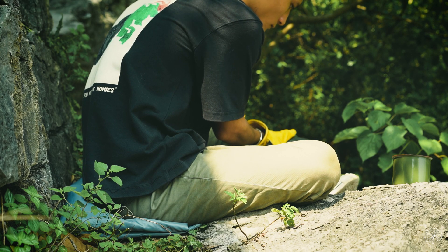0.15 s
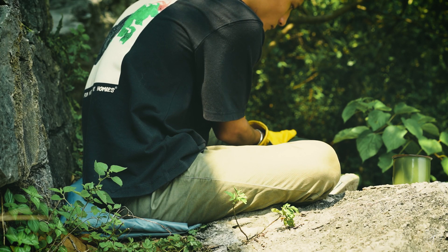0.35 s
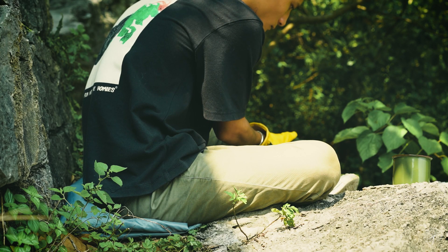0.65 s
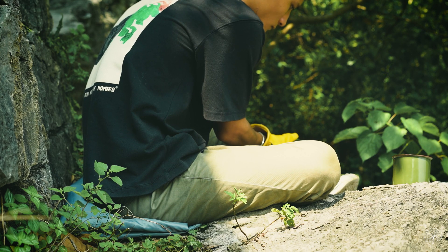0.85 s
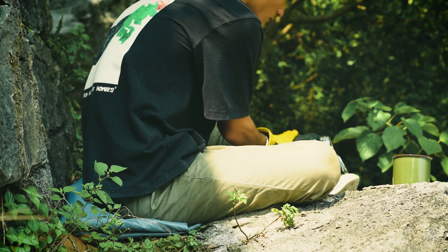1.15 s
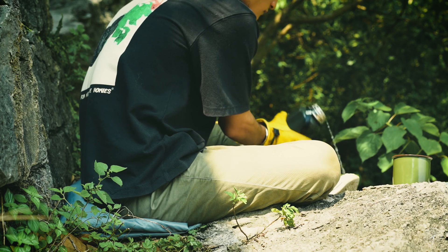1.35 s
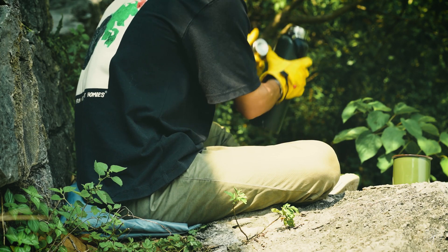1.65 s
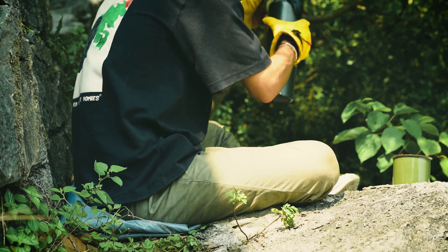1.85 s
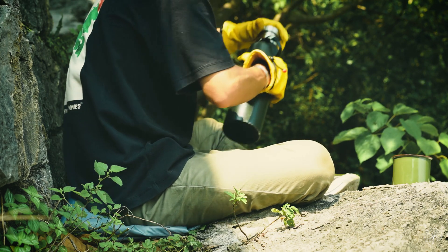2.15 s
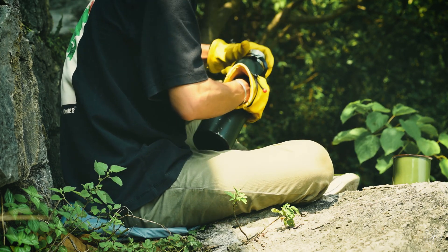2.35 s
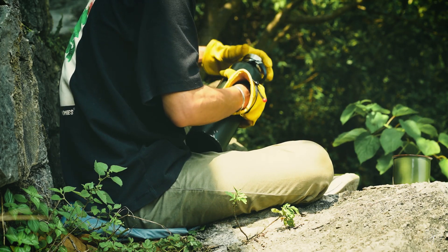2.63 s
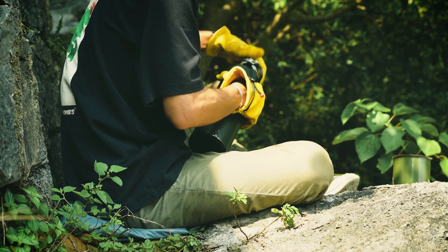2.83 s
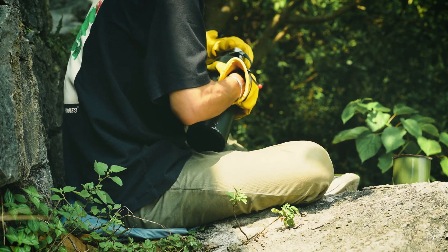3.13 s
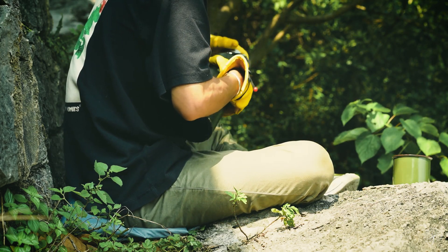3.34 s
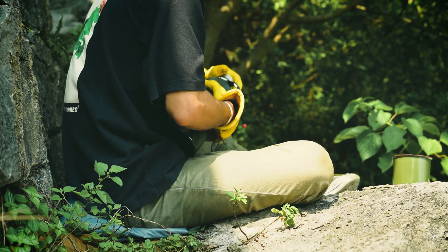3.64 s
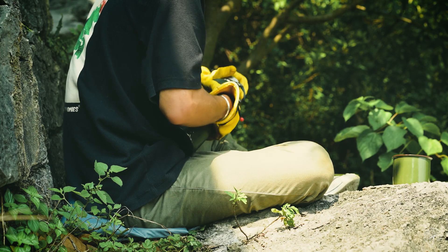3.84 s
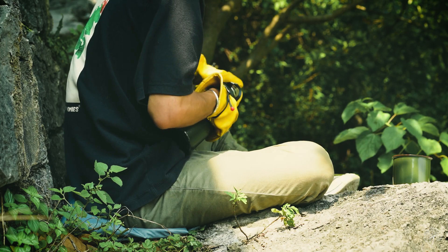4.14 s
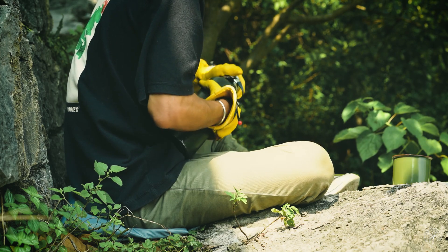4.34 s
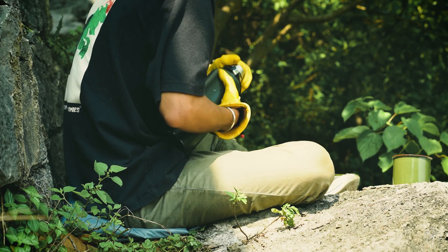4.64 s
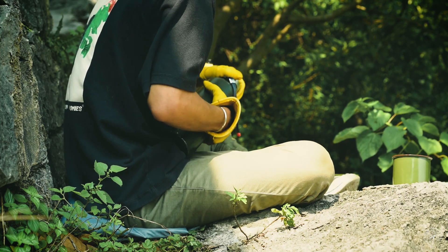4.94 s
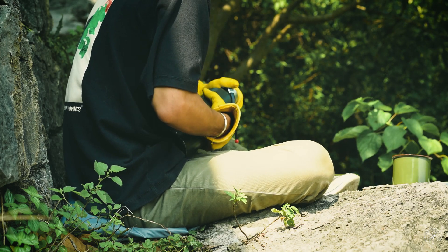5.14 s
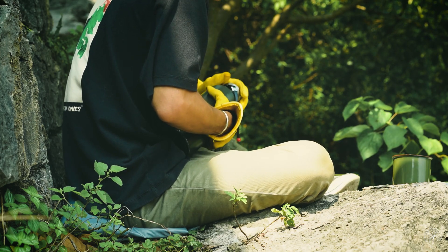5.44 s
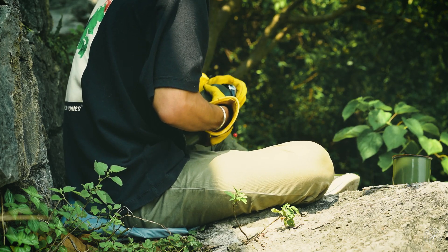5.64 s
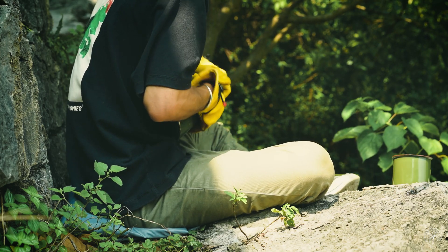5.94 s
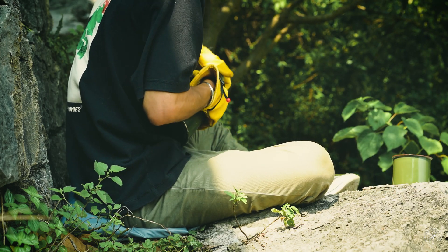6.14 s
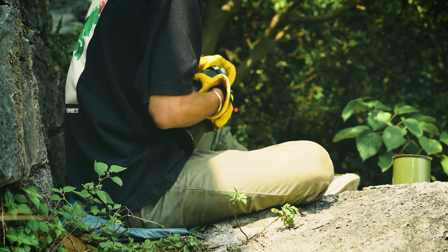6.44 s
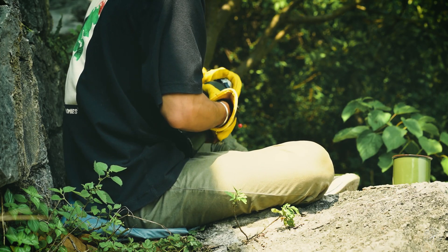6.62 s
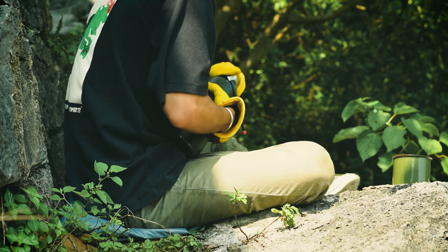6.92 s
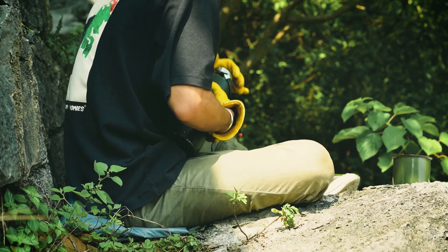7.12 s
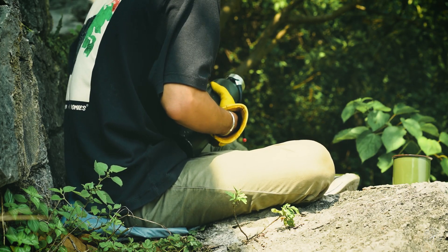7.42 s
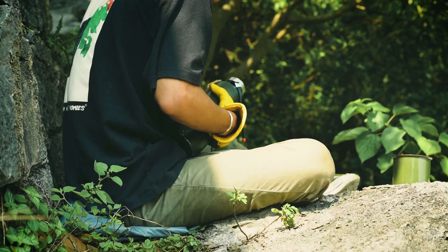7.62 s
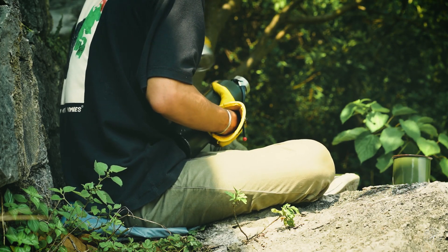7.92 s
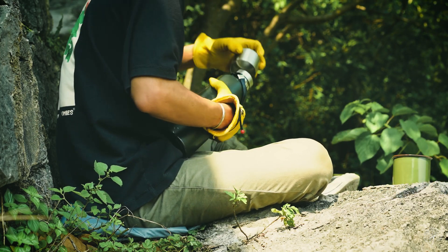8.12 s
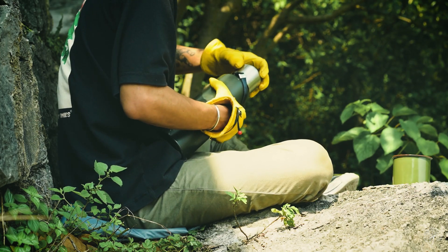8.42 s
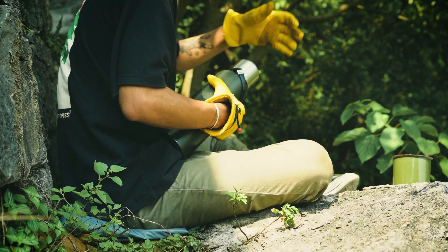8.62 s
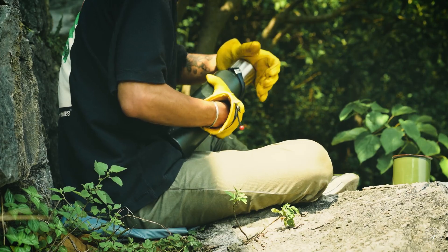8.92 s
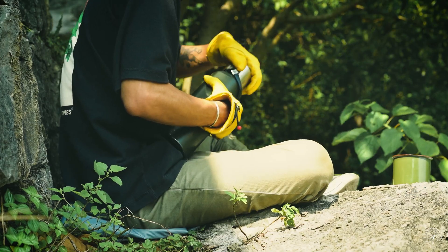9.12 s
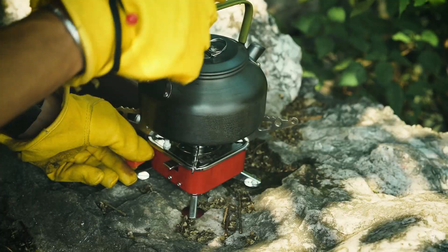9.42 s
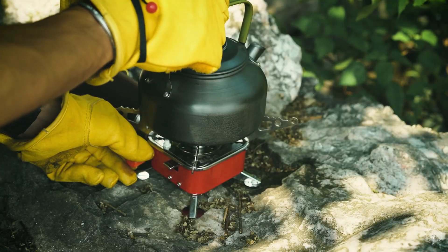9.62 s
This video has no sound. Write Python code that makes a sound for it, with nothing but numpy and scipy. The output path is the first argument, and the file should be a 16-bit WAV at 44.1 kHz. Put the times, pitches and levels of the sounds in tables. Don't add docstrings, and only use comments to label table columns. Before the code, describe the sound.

Soft glove and sleeve rubbing comes first under calm leaf hiss and a falling bird whistle. A bright stopper clink and rattle follow, then dry steel turns and leather grip noises. Later a thin cup scrapes, clatters down ringing, rocks into place and gets a dull slap. Close, dry handling stands before a wide wooded background; the last moment jumps to a quieter spot with chirping.

```python
import sys
import numpy as np
from scipy import signal
from scipy.fft import rfft, irfft, next_fast_len
from scipy.io import wavfile
from scipy.ndimage import uniform_filter1d

SR = 44100
rng = np.random.default_rng(int(sys.argv[2]) if len(sys.argv) > 2 else 0)


def store_pcm(level_fs):
    pcm = np.round(np.clip(level_fs, -1, 1) * 32767).astype(np.int16)
    wavfile.write(sys.argv[1], SR, np.atleast_2d(pcm).T)


def nominal_scale(level):
    x = np.asarray(level, float) / 20
    return 10 ** x


N = 430857


def evened(x):
    return x / np.sqrt(np.mean(x ** 2) + 1e-20)


def read(points, hz):
    f, value = np.transpose(points)
    return np.interp(np.log(hz + 1), np.log(f + 1), value)


def add(mix, s, sound):
    part = mix[:, round(s * SR):][:, :sound.shape[1]]
    part += sound[:, :part.shape[1]]


def coloured(x, db_of):
    length = x.shape[-1]
    size = next_fast_len(length)
    gain = nominal_scale(db_of(np.fft.rfftfreq(size, 1 / SR)))
    return irfft(rfft(x, size) * gain, size)[..., :length]


def resonate(x, hz, width):
    return signal.lfilter(*signal.iirpeak(hz, hz / max(width, 5), SR), x)


def pair(size, same):
    a, b = rng.standard_normal((2, size))
    same = np.clip(same, 0, 1)
    return np.array([a, same * a + np.sqrt(1 - same ** 2) * b])


# f/Hz, width/Hz, level/dB
FAR_DRONE = (398, 47, -74)


def drone():
    hz, width, db = FAR_DRONE
    return nominal_scale(db) * evened(resonate(resonate(pair(N, 0.96), hz, width), hz, width))


# f/Hz, level/dB per Hz
AIR_SPECTRUM = [(15, -70), (32, -37), (228, -8.5), (461, -13), (500, -7), (587, -8), (981, -4), (1120, -4),
                (1220, 0), (1680, 0.5), (2970, 3.5), (6660, 1.5), (15800, -9)]
# f/Hz, likeness [0-1]
AIR_LIKENESS = [(60, 0.92), (200, 1), (300, 0.85), (550, 0.44), (1650, 0.22), (4970, 0.006), (15000, 0.068)]
# f/Hz, left over right/dB
AIR_BALANCE = [(60, 0), (240, 0), (950, -2), (3770, 0.5), (15000, -5)]
# t/s, level/dB
WIND_STRENGTH = [
    (0.0, 0.5),
    (0.42, 0.5),
    (2.79, 5.5),
    (5.72, 5),
    (7.52, 8),
    (7.91, 6.5),
    (9.19, 7.5),
    (9.37, 9),
    (9.382, 1),
    (9.77, 1),
]
# calm level/dB, gain/dB per dB of wind, change at the new place/dB
AIR_LAYERS = [
    (-64, 0.4156, -0.5),
    (-57.5, 1.03, 1.5),
    (-62, 1.3965, 2.5),
]
NEW_PLACE_S = 9.376


def air(patchy_db=1.5, flicker_db=0.77):
    frames, hz = N // 128 + 5, np.fft.rfftfreq(512, 1 / SR)
    a, b, c, d, patches = rng.standard_normal((frames, 257, 5)).T
    patches = evened(uniform_filter1d(uniform_filter1d(patches, size=10, axis=0), size=20, axis=1))
    flicker = evened(uniform_filter1d(rng.standard_normal(frames), size=6))
    t = np.arange(frames) * 128 / SR
    power = nominal_scale(read(AIR_SPECTRUM, hz)) ** 2
    wind_db = np.interp(t, *np.transpose(WIND_STRENGTH))
    shares = [read([(700, 1), (1400, 0)], hz),
              read([(700, 0), (1400, 1), (5000, 1), (7200, 0)], hz),
              read([(5000, 0), (7200, 1)], hz)]
    field = 0
    for share, (calm_db, per_wind_db, moved_db) in zip(shares, AIR_LAYERS):
        level_db = calm_db + per_wind_db * wind_db + moved_db * (t > NEW_PLACE_S)
        band = share * power
        field = field + np.outer(band / np.sum(band), nominal_scale(level_db) ** 2)
    treble_flicker = np.outer(read([(800, 0.0044), (6000, flicker_db)], hz), flicker)
    field = np.sqrt(field) * nominal_scale(patchy_db * patches + treble_flicker)
    same = np.clip(read(AIR_LIKENESS, hz), 0, 1)[:, None]
    left = a + 1j * b
    right = same * left + np.sqrt(1 - same ** 2) * (c + 1j * d)
    spectra = np.array([left, right]) * field
    spectra *= nominal_scale(np.outer([.5, -.5], read(AIR_BALANCE, hz)))[:, :, None]
    return nominal_scale(3.5) * signal.istft(spectra, nperseg=512, noverlap=384)[1][:, :N]


# time/tail times, level/dB
GLIDE_FADE = [(-.08, -9), (.08, 1), (.25, -6), (.6, -7), (1.05, -12), (1.45, -24), (1.9, -27)]
KNEE_HZ, DROP_HZ_PER_S = 3450, 115000
CHIP_S, CHIP_DB, DIP_DB = .016, -15.5, -18
SWEEP_LEAN_DB, SWEEP_BURR = -4.5, 0.27


def sweep(knee, db, top_hz, tail, floor_hz, hold):
    drop = (top_hz - KNEE_HZ) / DROP_HZ_PER_S
    along, fade_db = np.transpose(GLIDE_FADE)
    along = along * hold
    t = np.arange(-drop - CHIP_S, along[-1] * tail, 1 / SR)
    curl = top_hz * (1 - 0.112 * np.clip(1 - 2 * (t - t[0]) / CHIP_S, 0, 1))
    falling = np.minimum(KNEE_HZ - DROP_HZ_PER_S * t, curl)
    levelling = floor_hz + (KNEE_HZ - floor_hz) * np.exp(-t / tail)
    hz = np.where(t < 0, falling, levelling)
    hz = uniform_filter1d(hz, size=350, mode="nearest")
    times = [t[0], -drop - CHIP_S / 2, -drop * .7, *(along * tail)]
    level = np.interp(t, times, [DIP_DB, CHIP_DB, DIP_DB, *fade_db])
    return knee + t[0], hz, db + level, SWEEP_LEAN_DB, SWEEP_BURR


def note(start, length, from_hz, to_hz, db, lean_db, burr):
    u = np.arange(0, length, 1 / SR) / length
    swell_db = np.interp(u, [0, 0.38, 1], [-6.5, 0, -6.5])
    return start, from_hz + (to_hz - from_hz) * u, db + swell_db, lean_db, burr


# knee t/s, level/dB, top f/Hz, tail time/s, floor f/Hz, glide hold [factor]
WHISTLES = [
    (.739, -32, 5650, 0.062, 1650, 1.1),
    (3.37, -30, 6100, .024, 1980, 1.55),
]
# t/s, length/s, from f/Hz, to f/Hz, level/dB
WARBLE_NOTES = [(1.19, 0.024, 5900, 4700, -51), (2.822, 0.1, 3540, 4490, -42),
                (2.952, 0.058, 4450, 2920, -44), (3.435, 0.039, 3800, 2950, -52),
                (5.669, 0.088, 3350, 3950, -43.5), (5.813, 0.068, 4050, 2800, -43),
                (6.426, 0.056, 3160, 3470, -45), (6.458, 0.093, 3440, 2850, -45),
                (6.448, 0.032, 3540, 3900, -42), (6.504, 0.035, 3982, 3780, -42.5),
                (7.079, .1, 3225, 4090, -46), (7.186, 0.022, 3540, 2830, -47),
                (7.232, 0.11, 3630, 4080, -43.5), (7.26, 0.048, 3200, 2740, -47),
                (7.375, 0.065, 4110, 2810, -46)]
# t/s, length/s, from f/Hz, to f/Hz, level/dB
NEW_PLACE_NOTES = [
    (9.385, 0.045, 6000, 4600, -50),
    (9.43, 0.031, 4600, 5400, -49),
    (9.452, 0.09, 5400, 5000, -49.5),
    (9.52, 0.13, 4750, 4000, -53),
    (9.47, 0.15, 3150, 2700, -51),
    (9.39, 0.064, 3100, 3100, -57),
]


def birds(trees, burr_hz=135., swing=.065, echo_db=-3., far_db=6., echo_t60=.3, near_t60=.06, near_db=6.):
    lag = np.arange(SR // 4) / SR
    calls = [sweep(*row) for row in WHISTLES]
    calls += [note(*row, lean_db=1.5, burr=0.82) for row in WARBLE_NOTES]
    calls += [note(*row, lean_db=2.0, burr=0.63) for row in NEW_PLACE_NOTES]
    for s, hz, db, lean_db, burr in calls:
        wobble, shake = evened(uniform_filter1d(rng.standard_normal((2, 20000)), size=150))[:, :len(hz)]
        turn = 2 * np.pi * np.cumsum(burr_hz * (1 + 0.22 * wobble)) / SR
        pitch = uniform_filter1d(hz, size=200) * (1 + burr ** 2 * swing * (np.sin(turn) + .5 * shake))
        tone = np.sin(2 * np.pi * np.cumsum(pitch) / SR) * (1 + burr * np.cos(turn))
        tone *= signal.windows.tukey(len(hz), .06)
        echoes = np.sign(rng.standard_normal((2, len(lag)))) * (rng.random((2, len(lag))) < 3000 / SR)
        echoes *= nominal_scale(-60 * lag / echo_t60) + nominal_scale(near_db - 60 * lag / near_t60)
        echoes /= np.linalg.norm(echoes, axis=1, keepdims=True)
        wet = nominal_scale(echo_db + far_db * burr)
        echoes = (wet * echoes + (lag == 0)) / np.sqrt(1 + wet ** 2)
        heard = signal.fftconvolve((np.sqrt(2) * nominal_scale(db) * tone)[None], echoes, axes=1)
        add(trees, s, heard * nominal_scale(np.array([[.5], [-.5]]) * lean_db))


def ledge(x, echo_db=-14., t60=0.18):
    lag = np.arange(SR // 4) / SR
    taps = rng.standard_normal((2, len(lag))) * (rng.random((2, len(lag))) < 2000 / SR)
    taps *= (lag > .003) * nominal_scale(-60 * lag / t60)
    taps /= np.linalg.norm(taps, axis=1, keepdims=True)
    return x + nominal_scale(echo_db) * signal.oaconvolve(x, taps, axes=1)[:, :N]


STROKE_DB = 20


def strokes(mix, table, peaks, slips_per_s=2500., grain_db=4., broad_db=-8., size=14000):
    def body(x):
        return sum(nominal_scale(db) / np.sqrt(w) * resonate(x, f, w) for f, w, db in peaks)

    for s, rise, fall, level_db, hiss_db in table:
        t = np.arange(size) / SR - rise
        press = nominal_scale(level_db - STROKE_DB * np.where(t < 0, -t / rise, t / fall)) * (t < fall)
        grains = nominal_scale(grain_db * np.minimum(rng.exponential(1, len(t)), 4))
        slips = evened(grains * (rng.random(len(t)) < slips_per_s / SR))
        drive = slips * pair(len(t), 0.71)
        ring = body(press * drive) / body(drive).std()
        broad = evened(coloured(drive, lambda f: read([(250, -11), (1000, 2), (4500, -4.0), (7000, -71)], f)))
        hiss = evened(coloured(drive + pair(len(t), 0.11),
                               lambda f: read([(4000, -32), (6000, 6.0), (15000, -3.0)], f)))
        add(mix, s - rise, ring + press * (nominal_scale(broad_db) * broad + nominal_scale(hiss_db) * hiss))


# firmest t/s, press-on/s, let-go/s, pressure level/dB, hiss above the ring/dB
CLOTH_STROKES = [
    (.285, 0.072, 0.065, -56, 0),
    (0.438, 0.097, .045, -57, -16),
    (1.2, 0.068, .3, -78, 14),
    (1.485, .01, 0.14, -56.5, 6),
    (1.62, 0.26, 0.16, -55.5, -9),
    (1.759, 0.23, 0.077, -56, -2),
]
GRIP_STROKES = [(4.3, 0.058, 0.098, -48, -20), (4.345, .04, 0.022, -44.5, -11.5),
                (4.385, 0.038, 0.049, -45, -9), (4.44, 0.055, 0.26, -55, 2), (4.678, 0.06, 0.17, -49.5, -5),
                (6.964, 0.033, 0.041, -46, -21), (7.015, .04, 0.039, -48.5, -18),
                (8.12, .12, 0.079, -63, -4), (9.14, 0.044, 0.11, -50.5, -8), (9.302, .05, 0.047, -45, -1),
                (9.371, 0.131, .006, -51, -3)]
# f/Hz, width/Hz, level/dB
GLOVE_PEAKS = [(538, 35, -5.5), (970, 68, -4.5), (1640, 370, 6.5), (2700, 1100, 14.5), (3630, 180, 8),
               (4700, 360, -30)]


def gloves_and_cloth(hands):
    strokes(hands, GRIP_STROKES, GLOVE_PEAKS, slips_per_s=2700.0, grain_db=4.0, broad_db=-17.0, size=9000)
    strokes(hands, CLOTH_STROKES, GLOVE_PEAKS, slips_per_s=3600.0, grain_db=-0.5, broad_db=-15.0, size=28000)


# t/s, peak level/dB, f/Hz
DRY_TICKS = [(.6449, -50, 4750), (0.927, -40, 2400), (1.137, -55, 1600), (1.3144, -48, 2860),
             (1.4765, -47, 4790), (1.7589, -42, 3600), (3.54, -45, 1500), (3.61, -43, 3850),
             (3.638, -44, 2000), (3.661, -46, 3500), (3.6645, -41, 2820), (3.6804, -43, 2900),
             (3.699, -48, 2800), (3.7158, -47, 3300), (4.281, -44, 2500), (4.298, -42, 2600),
             (4.34, -44, 3000), (4.37, -44, 2970), (4.49, -44, 5000), (6.963, -45, 1700),
             (7.026, -47, 2700), (7.5348, -35, 2100), (2.9364, -41, 1630), (3.0084, -39, 2620),
             (3.067, -48, 1640), (4.1649, -48, 3260), (7.0528, -45, 3060), (7.5332, -29.5, 3230),
             (9.2798, -39, 4720), (9.2999, -32.5, 3780)]


def ticks(hands, tick_q=3.):
    for s, peak_db, hz in DRY_TICKS:
        click = pair(600, 0.42) * np.exp(-np.arange(600) / 43.0)
        click = resonate(resonate(click, hz, hz / tick_q), hz, hz)
        add(hands, s, nominal_scale(peak_db + 5.5) * click / abs(click.mean(0)).max())


# t/s, f/Hz, level/dB, length/s
KNOCKS_AND_RINGS = [(.02, 1270, -61, .12), (.21, 1290, -61, .08), (.265, 780, -55, .04), (.4, 1290, -63, .08),
                    (.845, 3900, -62, .09), (1.02, 770, -55, .05), (1.15, 1000, -57, .04),
                    (1.62, 235, -52, .05), (2.52, 1660, -54, .08), (2.78, 2750, -58, .05),
                    (3.24, 570, -52, .06), (3.76, 500, -58, .05), (4.38, 500, -56, .04), (4.7, 480, -59, .04),
                    (4.755, 3750, -49, .02), (5.92, 1530, -51, .045), (5.953, 918, -47, .1),
                    (5.95, 1640, -52, .05), (6.03, 1900, -57, .03), (6.455, 925, -50, .065),
                    (6.54, 1140, -54, .03), (6.45, 1600, -51, .075), (6.56, 1550, -52, .02),
                    (3.02, 1650, -48, .035), (3.03, 2950, -51, .03), (7.533, 1600, -46, .012),
                    (7.552, 1640, -44, .045), (7.548, 2430, -46, .035), (7.555, 3950, -44, .03),
                    (7.54, 4400, -50, .04), (2.335, 918, -46, .11), (2.345, 1690, -50, .07),
                    (7.597, 1250, -48, .055), (7.536, 3300, -43, .014), (7.62, 1640, -46, .025),
                    (7.62, 2470, -48, .03), (9.278, 4720, -48, .03), (9.29, 1800, -50, .025),
                    (9.165, 900, -54, .025)]


def knocks(hands, rough=.22):
    for s, hz, db, length in KNOCKS_AND_RINGS:
        t = np.arange(0, length, 1 / SR)
        drift = uniform_filter1d(uniform_filter1d(rng.standard_normal((2, 8000)), size=200), size=200)
        shake, waver = rough * evened(drift)[:, :len(t)]
        uneven = (1 + shake) / np.hypot(1, rough)
        swell = np.sin(np.pi * (t / length) ** 0.39)
        tone = swell * uneven * np.sin(2 * np.pi * hz * t + waver)
        add(hands, s, np.sqrt(2) * nominal_scale(db) * tone * np.ones((2, 1)))


# firmest t/s, press-on/s, let-go/s, pressure level/dB, hiss above the ring/dB
THREAD_TURNS = [
    (2.95, 0.013, 0.12, -48.5, -3),
    (3.035, 0.051, 0.095, -43.5, -15),
    (3.125, 0.072, 0.021, -49, -20),
    (5.938, 0.032, 0.097, -39, -7),
    (5.965, 0.034, 0.015, -39, -3),
    (6.49, 0.13, 0.22, -44.5, -6.5),
]
# f/Hz, width/Hz, level/dB
THREAD_PEAKS = [(470, 16, -12), (920, 22, -16), (1613, 210, 1), (2950, 70, -3), (3500, 420, 1),
                (6760, 300, -10)]


def thread(hands):
    strokes(hands, THREAD_TURNS, THREAD_PEAKS, slips_per_s=3000., grain_db=2.5, broad_db=-8.)


# firmest t/s, press-on/s, let-go/s, pressure level/dB, hiss above the ring/dB
CUP_SLIDES = [
    (7.536, 0.0038, 0.057, -36, -24),
    (7.56, 0.031, 0.049, -38, -23),
    (7.629, 0.078, 0.067, -40.5, -21),
    (7.658, .03, 0.028, -41, -9),
    (7.74, 0.19, 0.068, -52, 0.5),
]
# f/Hz, width/Hz, level/dB
RIM_PEAKS = [(490, 110, -6.5), (820, 81, -5), (1253, 17, -1), (1640, 43, 5.5), (2440, 39, 2.5),
             (2850, 40, -1), (3350, 200, 1), (3920, 97, 4.5), (4450, 33, 0), (4740, 53, -12),
             (6570, 34, -9)]


def rim(hands):
    strokes(hands, CUP_SLIDES, RIM_PEAKS, slips_per_s=2000., grain_db=3., broad_db=-11.)


# f/Hz, level/dB per Hz
CLATTER_SPECTRUM = [(250, -20.5), (460, -17.5), (1000, -9.5), (1640, -14), (2300, -1), (3300, -3.5),
                    (4200, -3), (6800, -3), (8100, -13.5), (9500, -1.5), (15500, -5)]


def blows(mix, table, modes, treble_db, soft_share=0.23, twin_db=-7.0, spread_hz=6900.0, clatter_t60=0.09,
          split=0.028, size=11000):
    t = np.arange(size) / SR
    hz, db, t60 = np.repeat(modes, 3, axis=0).T[:, :, None]
    swell = np.minimum(t * hz / 2.0, 1)
    cluster_db = np.tile([[0], [twin_db], [twin_db - 7]], (len(modes), 1))
    looseness = np.minimum(0.085 / t60, 1) * np.tile([[.2], [1], [1]], (len(modes), 1))
    for s, peak_db, contact, damping, clatter_db in table:
        detune, step, strike = rng.uniform(-1.28, 1, (90, 3)).T[:, :len(hz), None]
        tuned = hz * (1 + detune * (0.0047 + split * hz / 19000.0) * looseness)
        lag = np.multiply.outer([.5, -.5], np.pi * step * np.minimum(hz / spread_hz, 1))
        level = nominal_scale(db + cluster_db + 3. * strike - 60 * t * damping / t60)
        ring = (level * swell * np.sin(2 * np.pi * tuned * t + lag)).sum(1)
        push = rng.standard_normal(1500) * np.exp(-t[:1500] / max(contact, 1e-4))
        push[0] = 1.8 * np.linalg.norm(push)
        ring = signal.fftconvolve(ring, push[None], axes=1)[:, :len(t)]
        clatter = evened(coloured(pair(len(t), 0.6), lambda f: read(CLATTER_SPECTRUM, f)))
        clatter *= nominal_scale(clatter_db - 60 * t * damping / clatter_t60)
        sound = ring / abs(ring.mean(0)).max() + clatter * np.minimum(t / 0.0011, 1)
        sound *= np.minimum((t[-1] - t) / .05, 1)
        tilt_db = treble_db + soft_share * (peak_db - 3.0)
        add(mix, s, nominal_scale(peak_db) * coloured(sound, lambda f: read([(7200, 0.0038), (9000, tilt_db)], f)))


# t/s, peak level/dB, contact time/s, damping by the grip [factor], clatter level/dB
NECK_MODES = [(404, -38, 0.2), (918, -33, 0.51), (1535, -15.5, 0.1), (1750, -22, 0.27), (1870, 1, 0.026),
              (2040, -23, 0.21), (2950, -12, 0.076), (3185, -18.5, 0.17), (3540, -6.5, 0.016),
              (3970, -15, 0.056), (4580, -11, 0.048), (6715, -4.5, 0.039), (7120, -30, 0.16),
              (10550, -22, .1)]
NECK_HITS = [
    (2.1703, -6.5, 0.0081, 0.64, -23),
]
STOPPER_MODES = [(446, -40.5, 0.23), (920, -31, 0.3), (1672, 1, 0.026), (1700, -23, .25),
                 (2834, -11, 0.058), (3070, -19.5, 0.12), (3430, -12.5, 0.045), (3900, -16, 0.068),
                 (4900, -26, .082), (6900, -14.5, 0.12), (8900, -23, 0.113), (12900, -29, 0.067)]
STOPPER_HITS = [
    (2.249, -17.5, 0.009, 0.77, -10),
    (2.2644, -7, 0.014, 0.99, -19.5),
]
RATTLE_MODES = [(465, -27.5, .2), (918, -31, 0.6), (975, -10, 0.054), (1710, 0.5, 0.035),
                (1920, -11, 0.068), (2300, -15, .06), (2980, -2, 0.038), (3480, -9, .08),
                (3780, -0.5, 0.031), (4020, -21, 0.045), (4700, -7, .06), (5190, -19, 0.026),
                (6800, -16, .05), (8400, -13, .045)]
RATTLE_HITS = [
    (2.3179, -14, 0.00098, 1.8, -12),
    (2.3205, -18.5, 0.0012, 1.8, -16),
    (2.327, -23.5, 0.0033, 0.78, -9),
    (2.3337, -23.5, 0.0024, 2, -13),
    (2.338, -27, .002, 1, -13),
]


def stopper(hands):
    blows(hands, NECK_HITS, NECK_MODES, split=0.0067, spread_hz=8000.0, treble_db=-9.5, clatter_t60=0.21)
    blows(hands, STOPPER_HITS, STOPPER_MODES, treble_db=-1.5, clatter_t60=0.11)
    blows(hands, RATTLE_HITS, RATTLE_MODES, size=6000, treble_db=2.5, clatter_t60=0.09)


TILT_MODES = [(465, -31, .12), (1642, -1.5, 0.097), (2500, -8, 0.076), (2873, -19, .1), (3200, -2, 0.034),
              (3470, -1, .05), (3930, 3.5, .04), (4420, -17, .05), (5400, -4, .04), (7100, -10, .05),
              (9600, -4, .04), (10140, -12, .05), (12650, -16, .05), (13800, -22, .06)]
TILT_HITS = [
    (8.2518, -12, .003, 0.84, -13.5),
    (8.2555, -16.5, 0.0023, 1.27, -14),
    (8.268, -22, .003, 1, -11),
]
CUP_MODES = [(130, -36, .04), (465, -25.5, 0.15), (1600, -6, 0.044), (2850, -16, 0.17), (3270, -7, 0.062),
             (3830, -10, 0.047), (4540, -17, 0.1), (5460, -5, 0.042), (7050, -11.5, 0.086),
             (9740, -4, 0.07), (11100, -14, 0.106), (13500, -28, 0.09)]
CUP_HITS = [
    (8.277, -7, 0.0032, 0.83, -15.5),
    (8.281, -13.5, .002, 0.95, -8),
    (8.287, -15, 0.0027, 1, -6),
    (8.297, -21, 0.0028, 0.59, -9),
    (8.304, -27, .003, 0.79, -9),
]
BELL_MODES = [(1637, 1, 0.13), (2850, -17, 0.15), (3190, -23, .12)]
BELL_HITS = [
    (8.2776, -10, 0.0018, 0.89, -40),
    (8.4183, -15, 0.0014, 1, -40),
]
ROCK_MODES = [(460, -23.5, 0.22), (1618, 2, 0.049), (2060, -12, .06), (2820, -5, 0.063), (3210, -11, 0.064),
              (3850, -3, 0.091), (4700, -19, .04), (5350, -20, .05), (6360, -7, 0.088), (7000, -16, .06),
              (9860, -7, .07), (11350, -20, .06), (13650, -11, .06)]
ROCK_HITS = [
    (8.364, -28.5, .003, 0.89, -5),
    (8.3724, -13.5, .004, 1, -9.5),
    (8.379, -18, .003, 0.79, -12),
    (8.389, -26, 0.0026, 1, -5),
    (8.397, -28, 0.0028, 0.65, 0),
    (8.4055, -17.5, .004, 0.78, -2),
]
SEAT_MODES = [(130, -36, .04), (483, -27.5, 0.14), (1663, -11.5, 0.046), (2380, -35, 0.074),
              (2850, -31, 0.1), (3900, -13, 0.045), (4740, -19.5, 0.13), (1690, -33, 0.4),
              (5809, -39.5, .9), (6400, -13, .07), (6700, -11, 0.11), (9800, -7.5, 0.045),
              (11300, -6.5, 0.047), (13200, -16, 0.06)]
SEAT_HITS = [
    (8.411, -17.5, .003, 1.1, -10),
    (8.4172, -9, 0.0024, 1.2, -8),
    (8.4205, -10, 0.0065, 0.83, -10),
    (8.425, -15.5, 0.0044, 1.27, -6),
    (8.433, -18, 0.0047, 1.6, -7),
    (8.44, -24, .003, 1.5, -12),
    (8.5644, -28, 0.001, 0.91, -4),
    (8.577, -34, .004, 1.2, -2),
    (8.599, -40, .004, 1, 0),
]
SLAP_MODES = [(258, -5, 0.015), (464, -19, 0.085), (780, -9, .008), (1170, -6.5, 0.0049), (1500, 3, 0.0054),
              (1697, -26, 0.14), (1950, 8, 0.0065), (2300, -12, 0.014), (2900, -4, 0.0086),
              (3670, -5, 0.0087), (3780, -26, 0.15), (4700, -16, 0.014), (5900, -18.5, 0.026),
              (7600, -24, .03)]
SLAP_HITS = [
    (8.8431, -17.5, 0.00069, 2.1, -7.5),
    (8.8461, -16, 0.0015, 0.78, -19),
    (8.8488, -6, 0.00093, 0.81, -37),
    (8.965, -34.5, 0.0009, 3.1, -10),
]


def cup(hands):
    blows(hands, TILT_HITS, TILT_MODES, size=6000, treble_db=1.0, clatter_t60=.07)
    blows(hands, CUP_HITS, CUP_MODES, size=8000, twin_db=-10.0, treble_db=1.0, clatter_t60=0.12)
    blows(hands, BELL_HITS, BELL_MODES, size=9000, twin_db=-15.0, treble_db=0.)
    blows(hands, ROCK_HITS, ROCK_MODES, size=6000, treble_db=-0.5, clatter_t60=0.12)
    blows(hands, SEAT_HITS, SEAT_MODES, twin_db=-6.5, treble_db=-2.0, clatter_t60=0.09)
    blows(hands, SLAP_HITS, SLAP_MODES, size=7000, treble_db=-4.0, clatter_t60=0.16)


# f/Hz, left over right/dB
HAND_BALANCE = [(300, 1.5), (640, -2), (1500, -0.5), (3100, 1), (6800, 0), (10000, -8)]


def scene():
    hands, trees = np.zeros((2, 2, N))
    birds(trees)
    for source in (gloves_and_cloth, ticks, knocks, thread, rim, stopper, cup):
        source(hands)
    hands = signal.sosfilt(signal.butter(2, 220., "high", fs=SR, output="sos"), hands)
    hands = coloured(hands, lambda f: np.outer([.5, -.5], read(HAND_BALANCE, f)))
    return drone() + air() + trees + ledge(hands)


def low_pass(x):
    return signal.sosfilt(signal.butter(12, 16830, fs=SR, output="sos"), x)


def record(dry):
    shut = coloured(dry, lambda f: np.interp(f, [20, 55, 15800, 15950], [-14, 0, 0, -55]))
    return low_pass(shut)


dry = scene()
out = record(dry)
store_pcm(out)
```